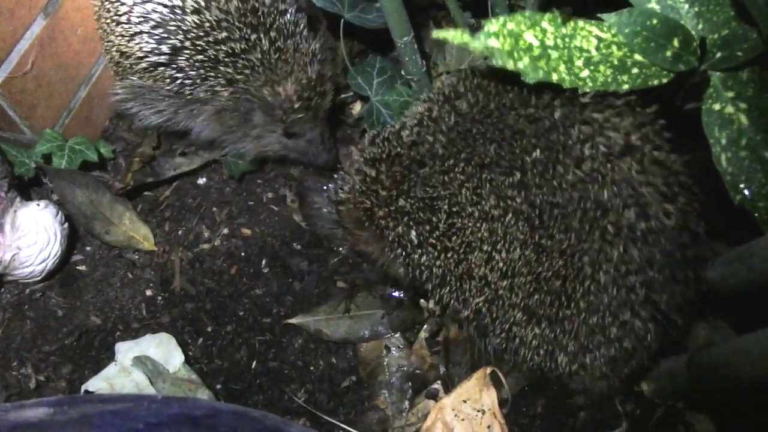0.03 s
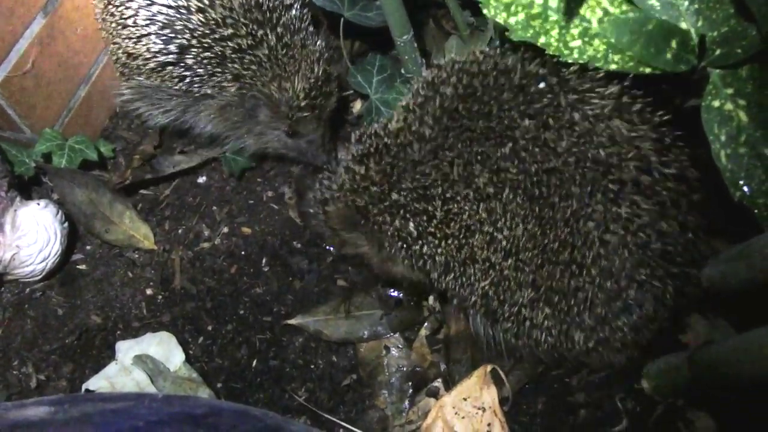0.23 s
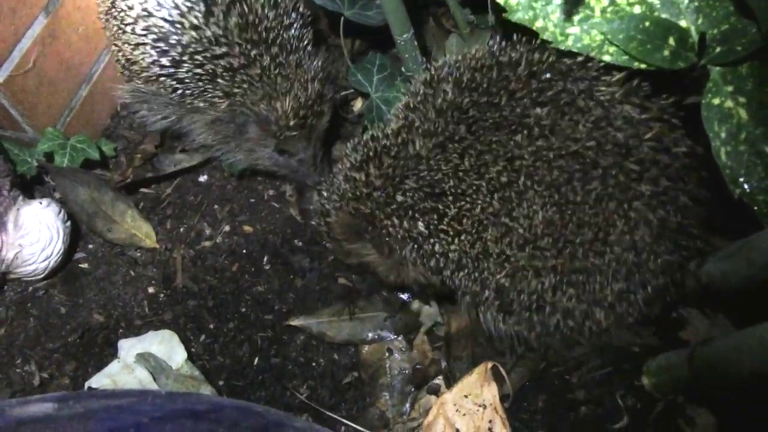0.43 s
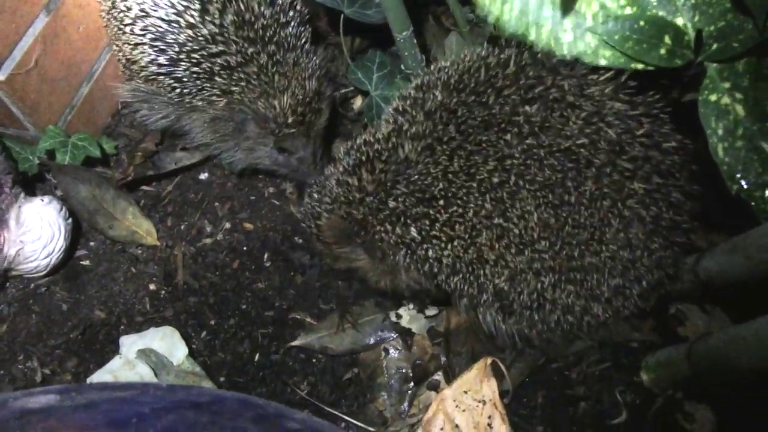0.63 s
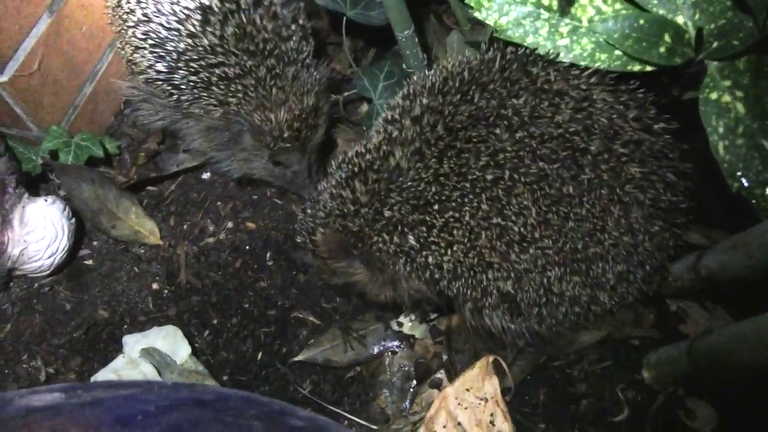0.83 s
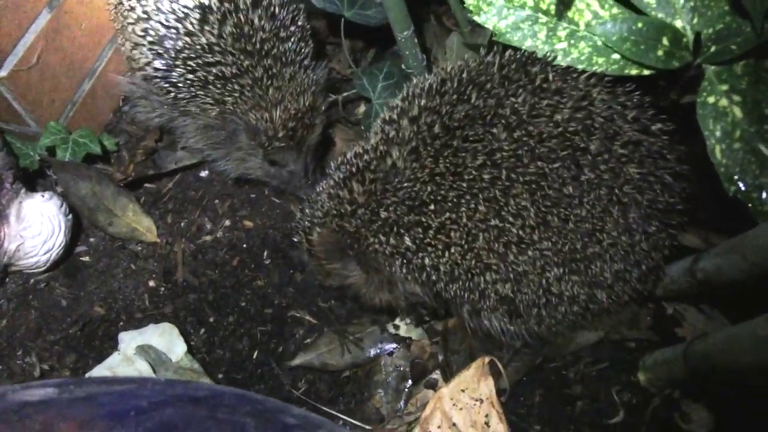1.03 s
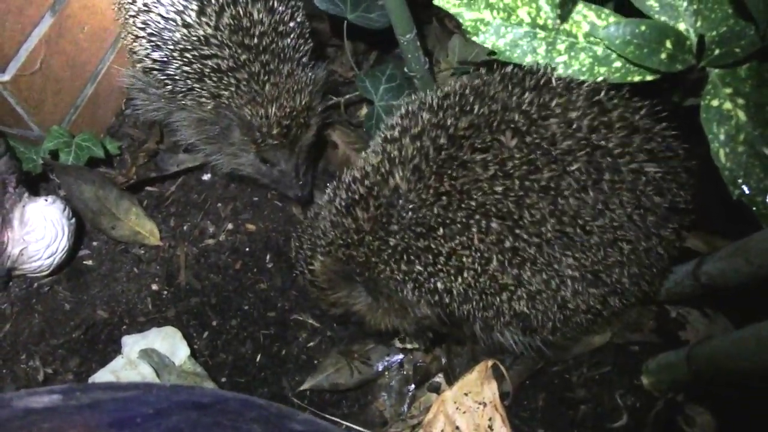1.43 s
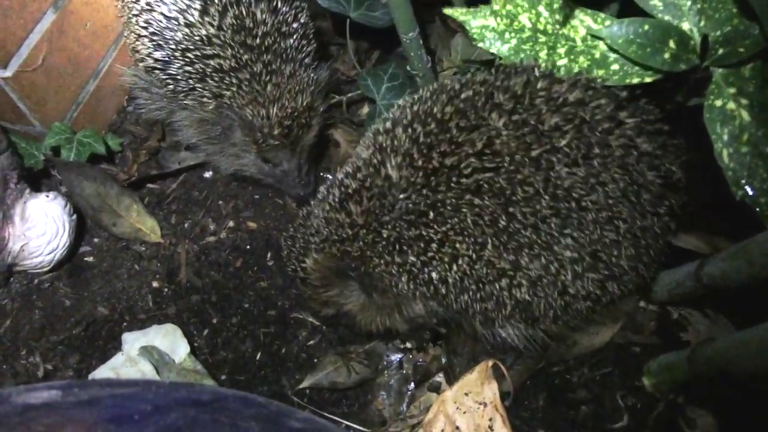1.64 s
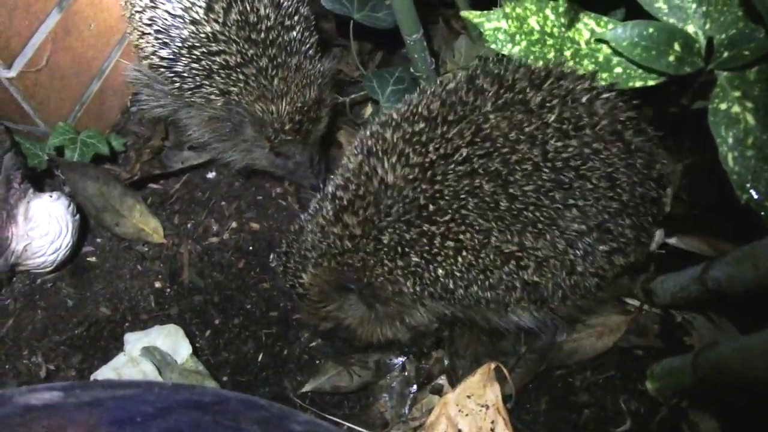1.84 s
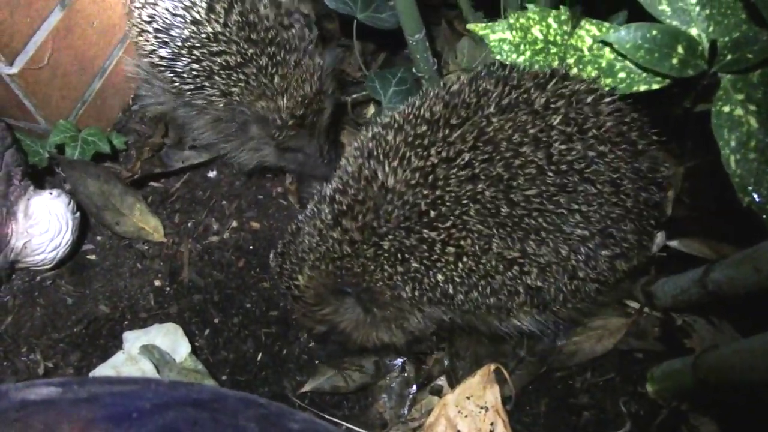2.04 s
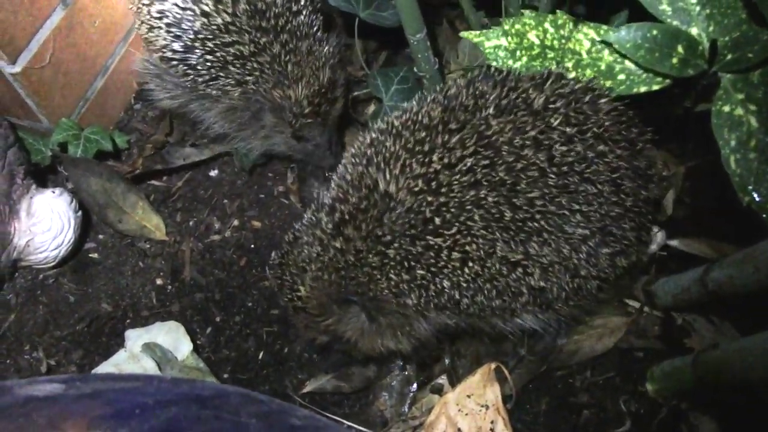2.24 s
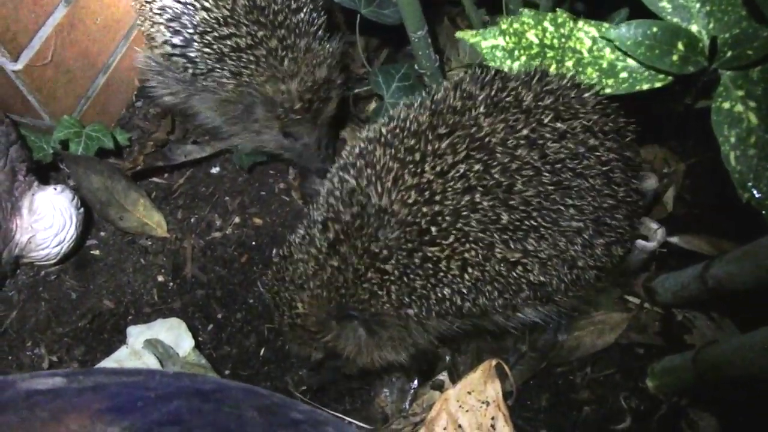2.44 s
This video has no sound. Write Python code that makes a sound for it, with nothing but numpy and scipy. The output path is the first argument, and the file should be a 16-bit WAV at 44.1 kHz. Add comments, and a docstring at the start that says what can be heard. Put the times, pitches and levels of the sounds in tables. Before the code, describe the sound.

A hedgehog huffs close by seven times, at about 0.2, 0.5, 0.9, 1.1, 1.5, 1.9 and 2.3 seconds. Each huff is a brief, bright nasal hiss with a dull flutter underneath; the second ends in a tiny high squeak, and the last ones are less hissy. Soft sniffs, faint dry leaf rustling and a few ticks fill the gaps, over a faint distant rumble in a quiet garden.

```python
"""Two hedgehogs face each other close by in a quiet night garden; one huffs about three times a second.
Each huff is a short push of air through the nose: turbulence makes a bright hiss and a lower rush,
narrow resonant peaks colour both, and the nostrils flutter unevenly. One huff ends in a tiny squeak.
Softer sniffs and the rustle of feet and spines on dry leaves fill the gaps, over a faint distant rumble."""
import sys
import numpy as np
from scipy import signal
from scipy.fft import rfft, irfft
from scipy.io import wavfile

SR = 44100
rng = np.random.default_rng(int(sys.argv[2]) if len(sys.argv) > 2 else 0)


def pcm_store(signal):
    """Save signal as 16-bit PCM."""
    levels = np.round(np.clip(np.atleast_2d(signal), -1, 1) * 32767)
    wavfile.write(sys.argv[1], SR, levels.astype(np.int16).T)


N = 114660
TIME, FREQS = np.arange(N) / SR, np.arange(N // 2 + 1) * SR / N

# Left-right coherence of the direct huffs and of the scattered garden sound: frequency_hz, correlation
HUFF_COHERENCE = [(100, .96), (450, .975), (1000, .95), (1400, .8), (2000, .85), (2600, .98), (4200, .98),
                  (5000, .88), (6500, .79), (8500, .77), (10300, .82), (11800, .64), (13000, .55),
                  (15000, .2)]
GARDEN_COHERENCE = [(60, 0.97), (200, 0.94), (350, 0.64), (900, .85), (1600, 0.73), (2200, 0.75),
                    (3500, 0.84), (5000, 0.77), (7500, 0.49), (10000, .3), (15000, 0.13)]


def from_db(db):
    """Decibels as an amplitude ratio."""
    return 10 ** (np.asarray(db) / 20)


def unit_rms(x):
    """Normalisation to a mean power of 1."""
    return x / np.sqrt(np.mean(x ** 2) + 1e-20)


def per_bin(points):
    """Linear interpolation of a table along a logarithmic frequency axis."""
    hz, value = np.transpose(points)
    return np.interp(np.log(FREQS + 1), np.log(np.sort(hz)), value)


def coloured(spectrum, source=None, extra_db=0, coherence=GARDEN_COHERENCE):
    """Source-filter model: two independent signals are filtered, then mixed as mid and side; rms 1."""
    if source is None:
        source = rng.standard_normal((2, N))
    mid, side = rfft(source) * from_db(per_bin(spectrum) + extra_db)
    alike = np.clip(per_bin(coherence), -1, 1)
    return unit_rms(irfft(np.sqrt(1 + alike) * mid + np.sqrt(1 - alike) * side * [[1], [-1]], N))


def drift(corner_hz):
    """Random modulation: low-passed noise of rms 1."""
    return unit_rms(irfft(rfft(rng.standard_normal(N)) / (1 + (FREQS / corner_hz) ** 2), N))


def butterworth(x, hz, kind, order):
    """Maximally flat high- or low-pass filter."""
    return signal.sosfilt(signal.butter(order, hz, kind, fs=SR, output="sos"), x)


def breath(start_s, length_s, level_db, arch_db, crest=0.41):
    """Airflow envelope: a parabola in decibels, arch_db down at half a length from its crest."""
    attack_s, release_s = 0.0089, 0.0065
    near = slice(*np.searchsorted(TIME, [start_s - attack_s, start_s + length_s + 10 * release_s]))
    age_s = TIME[near] - start_s
    progress = np.clip(age_s / length_s, 0, 1)
    opening = np.clip(age_s / attack_s + .5, 0, 1)
    release = np.exp(-np.maximum(age_s - length_s, 0) / release_s)
    envelope = np.zeros(N)
    envelope[near] = opening * release * from_db(level_db - arch_db * (2 * (progress - crest)) ** 2)
    return envelope


def night():
    """Ambient noise floor: distant rumble, a frequency-modulated hum and a thin, wavering hiss."""
    # Background spectra: frequency_hz, gain_db
    rumble_spectrum = [(20, -20), (36, -11.5), (55, 2.5), (75, 3), (110, -4.5), (145, -6), (172, -3),
                       (200, -11.5), (300, -15), (600, -22), (1000, -20), (1500, -27.5), (3000, -43.5),
                       (8000, -53.5), (16000, -48)]
    hiss_spectrum = [(2000, -15.5), (4000, -19.5), (6000, -21.5), (8500, -18.5), (10300, -6.5),
                     (12000, -8.5), (14000, -13.5), (16000, -45)]
    hum_hz = 172.5 + 2.26 * drift(3.5)
    hum = from_db(-63.5) * np.sqrt(2) * np.sin(2 * np.pi * np.cumsum(hum_hz) / SR)
    rumble = from_db(-50.5) * coloured(rumble_spectrum)
    hiss = from_db(-58.5 + 2.1 * drift(18)) * coloured(hiss_spectrum)
    return rumble + hum + hiss


def leaves():
    """Shot noise: tiny impacts of feet and spines on dry leaves merge to a rustle; a few ticks join it."""
    # Spectra of the leaf litter and of the ticks: frequency_hz, gain_db
    leaf_spectrum = [(200, 7), (800, 2.5), (1600, -1.5), (3000, 2.5), (4200, 4.5), (6500, 3), (10000, 5.5),
                     (13000, 0), (16000, -3)]
    tick_spectrum = [(200, -6), (800, -15), (1600, 4), (3000, 5), (4200, 12), (6500, 9), (9000, 10),
                     (12000, -10), (16000, -22)]
    # Envelope of the rustle: time_s, level_db
    rustle_levels = [(0, -52), (.08, -53.5), (.17, -58), (.38, -52.5), (.44, -64), (.52, -54.5), (.75, -56),
                     (.83, -62.5), (.97, -56.5), (1.11, -62), (1.28, -53), (1.48, -54), (1.77, -51.5),
                     (1.85, -62.5), (2.0, -57.5), (2.15, -57), (2.44, -51.5), (2.6, -77)]
    # Short ticks, the sharp start of the first sniff, then small clicks in the rustle: start_s, level_db
    ticks = [(.127, -45), (.307, -46), (0.323, -49), (.427, -58), (0.703, -36), (1.409, -45), (1.708, -42),
             (2.022, -65)]
    crackles_per_s, spread_db, tick_decay_s = 1100, 2.8, 0.0045
    sizes = from_db(spread_db * np.minimum(rng.exponential(1, (2, N)), 5))
    signs = rng.choice([-1, 1], (2, N))
    impacts = sizes * signs * (rng.random((2, N)) < crackles_per_s / SR)
    rustle = unit_rms(coloured(leaf_spectrum, impacts) + 1.08 * coloured(leaf_spectrum))
    rustle_envelope = from_db(np.interp(TIME, *np.transpose(rustle_levels)))
    tick_envelope = sum(from_db(db) * (TIME >= s) * np.exp(-np.clip(TIME - s, 0, .5) / tick_decay_s)
                        for s, db in ticks)
    return rustle * rustle_envelope + tick_envelope * coloured(tick_spectrum)


def resonance_db():
    """Resonance: narrow peaks that colour the huffs and sniffs; gain in dB per frequency bin."""
    # Resonant peaks: centre_hz, half_width_hz, height_db
    resonances = [(1800, 170, 4), (2540, 80, 5), (2870, 80, 7), (3250, 140, 5), (4010, 90, 10),
                  (4350, 110, 11), (4740, 60, 6), (5290, 100, 7), (5640, 120, 10), (6830, 120, 3),
                  (7820, 170, 7), (8540, 70, 5), (8900, 130, 6), (9760, 70, 4), (10220, 80, 6),
                  (11700, 110, 3), (12800, 150, 7)]
    return sum(db * np.exp(-((FREQS - hz) / width) ** 2) for hz, width, db in resonances)


def sniffs():
    """Weak flow noise: soft breaths, only lightly coloured by the resonant peaks."""
    # Soft breaths: start_s, length_s, level_db
    breaths = [(0.123, 0.044, -44), (0.287, 0.083, -47), (0.599, 0.13, -44), (1.313, 0.056, -42),
               (1.361, 0.069, -51), (1.607, 0.064, -50.5), (1.672, 0.092, -49.5), (1.987, 0.064, -51),
               (2.36, 0.1, -53)]
    # Spectrum of the flow: frequency_hz, gain_db
    spectrum = [(350, -57), (600, -1), (1310, -8.5), (1550, -8), (1720, -7), (2400, -3), (3110, 4.5),
                (3620, -0.5), (4150, 2), (5920, -0.5), (7480, 4.5), (9190, -2), (9980, 5.5), (13900, 3),
                (15900, -10)]
    # Left-right coherence: frequency_hz, correlation
    coherence = [(500, .9), (2000, 1), (3000, 1), (5000, 0.91), (7500, 0.58), (10000, 0.27), (15000, 0.12)]
    envelope = sum(breath(start_s, length_s, db, arch_db=11.5) for start_s, length_s, db in breaths)
    flow = coloured(spectrum, extra_db=0.16 * resonance_db(), coherence=coherence)
    return flow * envelope * from_db(2.75 * drift(63))


def huffs():
    """Turbulent flow: each push of air drives a nasal rush, a hiss at the nostrils and their flutter."""
    # Pushes of air: start_s, length_s, rush_db, hiss_db, top_db, flutter_db, flutter_s,
    # rush_crest_fraction, hiss_arch_db, hiss_pitch_ratio
    pushes = [(0.197, 0.093, -35.5, -22.5, -27, -38.5, 0.094, 0.46, 23, 0.98),
              (0.545, 0.081, -35.5, -26.5, -24, -38, 0.061, .33, 16, 0.96),
              (0.857, 0.079, -34, -28.5, -27, -38, 0.066, 0.39, 15.5, 1.03),
              (1.128, 0.076, -34.5, -27.5, -26.5, -39, 0.074, 0.42, 14, 0.98),
              (1.531, 0.081, -35, -30.5, -29.5, -39, 0.086, 0.62, 13.5, 1),
              (1.879, .095, -31.5, -29, -32.5, -39, 0.098, 0.43, 12.5, 0.99),
              (2.268, 0.085, -34.5, -35.5, -37.5, -42.5, 0.079, 0.34, 11, 0.97)]
    # Spectra of the rush, the hiss and its top band: frequency_hz, gain_db
    rush_spectrum = [(800, -40), (1230, -15), (1750, -6), (2150, -13), (2700, -2), (3500, 0), (4500, 2),
                     (6000, 1.5), (6900, 1), (7500, -10), (8500, -3)]
    hiss_spectrum = [(6500, -25), (7500, -7.5), (8300, -6), (9200, -2.5), (9800, 2), (10500, 5),
                     (11300, 0.5), (12200, -6.5), (13500, -26)]
    top_spectrum = [(10500, -16), (11700, -10), (12150, -1), (12400, 5), (13100, -7), (13850, 2),
                    (14350, -23), (14950, -36), (15300, -25), (15900, 1)]
    closing_s, closing_db = 0.004, -3  # the hiss flares as the nostrils close
    shaping = dict(extra_db=resonance_db(), coherence=HUFF_COHERENCE)
    rush, top = coloured(rush_spectrum, **shaping), coloured(top_spectrum, **shaping)
    air, flutter_envelope = np.zeros((2, N)), np.zeros(N)
    for start_s, length_s, rush_db, hiss_db, top_db, flutter_db, flutter_s, crest, arch_db, ratio in pushes:
        hiss = coloured([(hz * ratio, db) for hz, db in hiss_spectrum], **shaping)
        jet = breath(start_s, length_s, 0, arch_db, crest=.53)
        flare = breath(start_s + length_s - closing_s, closing_s, closing_db, arch_db)
        air += np.hypot(jet, flare) * (from_db(hiss_db) * hiss + from_db(top_db) * top)
        air += rush * breath(start_s, length_s, rush_db, arch_db=8.5, crest=crest)
        flutter_envelope += breath(start_s, flutter_s, flutter_db, arch_db=9, crest=0.47)
    turbulence = from_db(drift(270))  # 1 dB rms
    return air * turbulence + flutter() * flutter_envelope


def flutter():
    """Flow-induced vibration: the nostrils flap at uneven intervals, making dull pops over breath noise."""
    # Spectrum of the breath noise: frequency_hz, gain_db
    air_spectrum = [(120, 4.5), (300, 7), (550, 3.5), (850, -22.5), (1050, 6), (1250, -44), (2500, -60)]
    flaps_per_s, jitter, spread_db = 165, .3, 3
    gaps, sizes = rng.standard_normal((2, 1000))
    onsets = (np.cumsum(np.exp(jitter * gaps)) / flaps_per_s * SR).astype(int)
    flaps = np.zeros(N)
    flaps[onsets[onsets < N]] = from_db(spread_db * np.clip(sizes[onsets < N], -2, 1))
    pops = butterworth(flaps, 233, "high", order=2)
    pops = butterworth(pops, 556, "low", order=1)
    pops = butterworth(pops, 1037, "low", order=8)
    return unit_rms(pops) + from_db(-1.5) * coloured(air_spectrum, coherence=HUFF_COHERENCE)


def squeak():
    """Aerodynamic whistle: a closing nostril gives a falling tone, made breathy by random modulation."""
    # The whistle's glide: start_s, length_s, from_hz, to_hz, level_db
    glide = (.614, .009, 13400, 10200, -27)
    start_s, length_s, from_hz, to_hz, level_db = glide
    pitch_hz = np.interp(TIME, [start_s, start_s + length_s], [from_hz, to_hz])
    tone = np.sqrt(2) * np.sin(2 * np.pi * np.cumsum(pitch_hz) / SR)
    return tone * drift(240) * breath(start_s, length_s, level_db, arch_db=11)


def scene():
    """Superposition of animals and garden; level differences place both slightly left of centre."""
    # Stereo balance of the animals: frequency_hz, left_minus_right_db
    balance = [(60, .7), (600, 1.1), (2500, .1), (5000, .2), (5700, 1.8), (7300, -.5), (8700, 1.5),
               (9700, 4.5), (10300, 1.5), (10750, -4), (11300, 1), (11900, 4), (12600, 0), (15000, .5)]
    animals = huffs() + squeak() + sniffs()
    animals = irfft(rfft(animals) * from_db(per_bin(balance) * [[.5], [-.5]]), N)
    garden = (leaves() + night()) * from_db([[0.47], [-0.47]])
    return animals + garden


def record(dry):
    """Band limiting: an elliptic low-pass cuts the highest treble steeply."""
    cutoff_hz = 15900
    return signal.sosfilt(signal.ellip(12, .1, 80, cutoff_hz, fs=SR, output="sos"), dry)


dry = scene()
out = record(dry)
pcm_store(out)
```